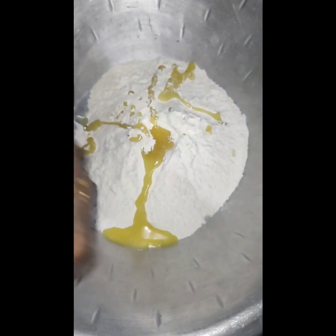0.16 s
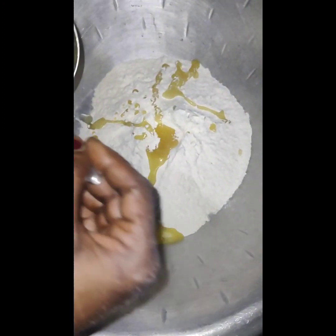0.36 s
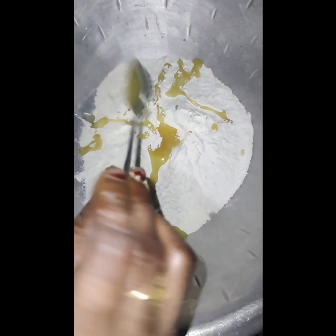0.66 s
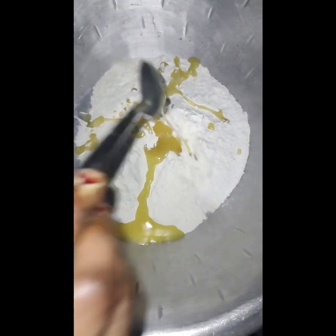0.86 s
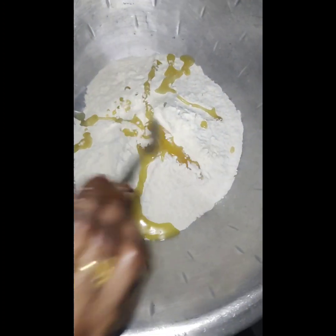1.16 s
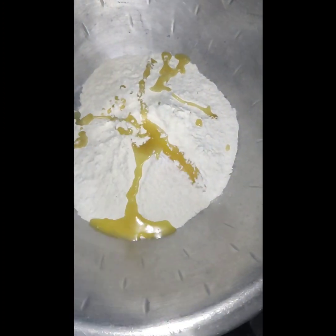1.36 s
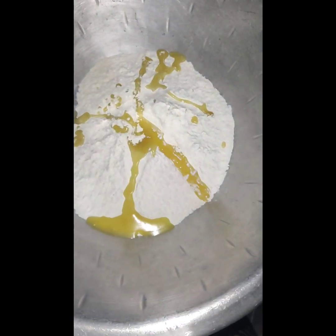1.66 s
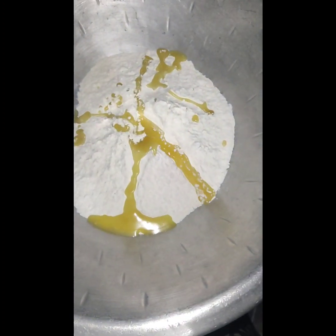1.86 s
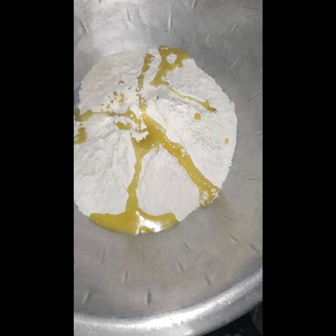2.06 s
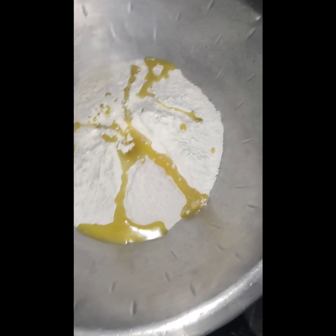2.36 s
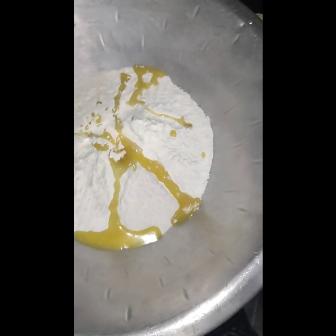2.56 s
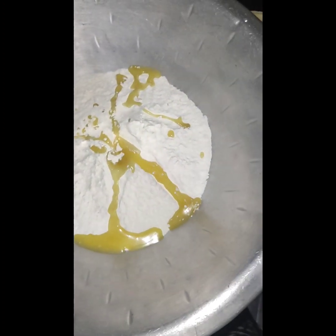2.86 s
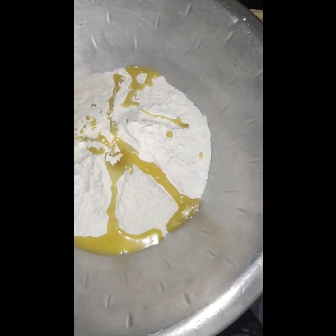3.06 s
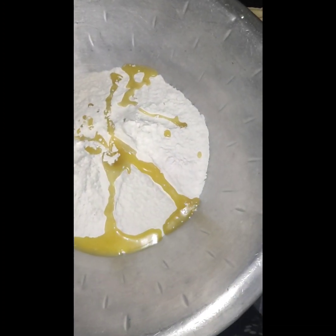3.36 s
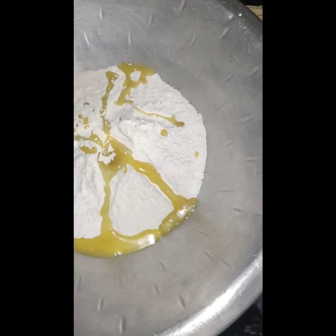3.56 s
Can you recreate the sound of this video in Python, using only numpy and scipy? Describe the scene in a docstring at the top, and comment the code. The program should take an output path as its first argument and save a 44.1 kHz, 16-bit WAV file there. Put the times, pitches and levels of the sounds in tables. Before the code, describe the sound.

Close to a phone in a quiet kitchen, a steel spoon gives light clinks, a pause, a thin tap, then a loud pot knock, short scrape and several bright clanks, fading to faint room murmur.

```python
"""A steel spoon knocks and scrapes in a steel pot just beside a phone, in a quiet hard-walled kitchen.
Before that it clinks on a small cup and taps the rim of a mixing bowl.
Every blow is a crack of noise, the vessel's clear modes and a dense decaying wash of high modes and room.
The scrape is friction grains through the pot's modes, with one mode singing; a low worktop hum swells
under the scrape and the knocks. Behind it all lie room murmur and microphone hiss."""
import sys
import numpy as np
from scipy import signal
from scipy.fft import rfft, irfft, next_fast_len
from scipy.io import wavfile
from scipy.ndimage import uniform_filter1d

SR = 44100
rng = np.random.default_rng(int(sys.argv[2]) if len(sys.argv) > 2 else 0)


def wav_out(sig):
    """Save sig, one row per channel (or a flat mono array), as 16-bit PCM at SR to the path in sys.argv[1]."""
    wavfile.write(sys.argv[1], SR, np.round(np.clip(np.atleast_2d(sig).T, -1, 1) * 32767).astype(np.int16))


N = 163170

# Room murmur and microphone hiss. Each row: frequency in Hz, relative density in dB per Hz.
ROOM_SPECTRUM = [(24, -42), (40, -11), (123, -1.5), (162, -16), (235, -4), (377, -14), (484, -14),
                 (1380, -24), (7340, -25), (15500, -35.5)]
# Likeness of the room in the two channels. Each row: frequency in Hz, left-right likeness from -1 to 1.
ROOM_LIKENESS = [(60, 0.75), (240, 0.98), (950, 0.1), (3770, -0.37), (15000, 0.55)]
ROOM_DB, PATCHY_DB = -62.5, 1.3  # overall level; depth of the patches

# Worktop thumps. Each row: start in seconds, level in dB before the swell, decay and left-right balance.
WORKTOP_THUMPS = [(1.803, -45.5), (1.949, -49.5), (2.08, -50), (2.214, -35.5), (2.361, -55), (2.499, -46),
                  (2.563, -32.5), (2.78, -38.5)]
TOP_HUM_HZ, TOP_T60_S, TOP_RISE_S = 121.3, 0.99, 0.015
TOP_FREE_S, TOP_FADE_T60_S = 0.081, 0.54  # the hum fades faster soon after

# Spoon dragged in the pot. Each row: time in seconds, level in dB, treble over the body in dB.
SCRAPE_COURSE = [(1.86, -35.5, 0.5), (1.912, -39.5, -5.5), (2.012, -39.5, 3.5), (2.068, -47.5, -7),
                 (2.084, -45.5, -5.5), (2.13, -49.5, -11), (2.148, -39.5, -9), (2.21, -59, -10.5)]
# Colour of the rubbed metal. Each row: frequency in Hz, relative density in dB per Hz.
SCRAPE_SPECTRUM = [(120, -36), (200, 4), (479, -20.5), (665, -9), (923, -22.5), (3610, -14), (15500, -13.5)]
# The pot singing under the stroke. Each row: time in seconds, peak in dB.
SONG_COURSE = [(1.97, -56), (1.994, -53), (2.06, -42), (2.146, -43), (2.19, -47)]
GRAINS_PER_S, GRAIN_DB, TREBLE_HZ = 4600, 1.5, 9600
SONG_HZ, GLIDE_HZ_PER_S = 658, 120  # the song rises
SHIFTING_DB = 4.5  # resonances come and go as the contact moves

# Blows on cup, bowl rim and pot. Each row: time in seconds, peak in dB (it sets the crack),
# levels in dB in the five bands 200-450, 450-1000, 1000-3000, 3000-8000 and 8000-15000 Hz,
# left-right in dB, ring time factor, seconds until the ring starts to fade faster,
# then Hz, dB, Hz, dB of the two modes that this contact point favours.
CUP_BLOWS = [(0.1276, -21, -63, -64, -61.5, -47, -48.5, 3.2, 0.32, 0.15, 3520, -57, 5320, -45),
             (0.1951, -27, -44, -35, -35, -32, -34.5, 4.3, 0.78, 0.13, 1210, -29, 3570, -31),
             (0.3483, -34.5, -61, -57.5, -50, -44.5, -43, 5.3, 0.78, 0.16, 1455, -34.5, 5950, -46.5)]
RIM_BLOWS = [(1.277, -25, -56, -45, -42.5, -34.5, -37, 3.5, 0.7, 0.13, 4400, -40, 3050, -48),
             (1.3683, -50, -70, -83, -51, -56, -43, -5.5, 0.14, 0.13, 8900, -61, 12300, -64),
             (1.3872, -34, -37, -72, -53.5, -62, -42.5, -1, 0.49, 0.07, 13200, -60, 12700, -59)]
POT_BLOWS = [(1.726, -7, -69, -23, -34, -28, -35.5, 1.5, 0.85, 0.2, 601.5, -17.5, 2163, -24.5),
             (1.8028, -30, -42, -60, -32.5, -23.5, -27, 2.2, 0.96, 0.13, 2373, -24.5, 6590, -26.5),
             (1.8535, -28, -44, -36, -51, -31, -49, 0.87, 1.2, 0.24, 3682, -32.5, 5470, -27.5),
             (2.081, -28, -59, -49.5, -58.5, -47.5, -48, 2.8, 1.6, 0.18, 3700, -48, 14000, -48.5),
             (2.1074, -42, -45.5, -42.5, -40.5, -86, -51, 5.4, 1.3, 0.23, 1486, -29, 1720, -40),
             (2.218, -24.5, -31, -20, -24.5, -33.5, -33, 1, 0.87, 0.13, 589, -18.5, 868, -18.5),
             (2.2625, -18.5, -36, -38.5, -48.5, -30.5, -30, 2.5, 1.1, 0.18, 3725, -30.5, 6030, -38),
             (2.33, -45.5, -43.5, -38, -51.5, -48.5, -49, 1.7, 0.8, 0.1, 613, -32, 870, -35.5),
             (2.4895, -17, -52.5, -42, -37, -59, -33, 4.5, 0.95, 0.17, 1680, -41, 6280, -34.5),
             (2.4952, -26.5, -58, -45, -46.5, -28, -32, 2.1, 1.03, 0.22, 1042, -34, 6000, -28),
             (2.565, -12, -28, -21.5, -24, -21, -16.5, 1.9, 0.73, 0.13, 532.3, -14, 6160, -21.5),
             (2.626, -34, -49, -46, -42, -41, -38.5, 2, 0.97, 0.14, 1900, -33, 3740, -29),
             (2.7049, -41.5, -42.5, -46, -63, -55, -39, 2.4, 1.1, 0.26, 504, -37, 1420, -49),
             (2.7814, -42.5, -35.5, -38.5, -38, -42.5, -43.5, 0.75, 0.69, 0.38, 2334, -34, 1530, -52),
             (3.1533, -59.5, -74, -63, -67, -64, -53, 2.8, 0.69, 0.15, 470, -73, 6550, -73),
             (3.5222, -50, -85, -79, -83.5, -74, -54.5, 1.8, 0.34, 0.18, 11640, -66.5, 14300, -61.5)]
# Edges of those five bands. One column: frequency in Hz.
BAND_EDGES_HZ = np.array([200, 450, 1000, 3000, 8000, 15000])

# Clear modes of each vessel. Each row: frequency in Hz, dB over the blow's level in that band,
# t60 in seconds before the ring time factor.
CUP_MODES = [(664, -3, 0.59), (783, 2, 0.15), (1258, -4, 0.4), (1358, 0, 0.28), (2660, -6, 0.24),
             (3735, -4.5, 0.14), (3570, 0.5, 0.13), (4050, -10, 0.2), (5030, -16, 0.16), (5500, -1, 0.1)]
RIM_MODES = [(703.4, 1, 16), (1064, -5.5, 1.6), (1240, -10, 1.1), (3003, -6, 0.46), (3470, -14, .2),
             (4070, -10, 0.18), (4867, -13, .16), (5180, -9, 0.17), (6040, -15, .15), (7830, -22, .17),
             (13200, 3, 0.074)]
POT_MODES = [(276.7, -2.5, 0.29), (367.3, -6.5, 0.28), (584, -1.5, 0.22), (779, -9.5, 0.12),
             (501, -17, 0.56), (832, -8.5, 0.093), (1137, -6.5, 0.28), (1600, -11, 0.25),
             (2170, -11.5, 0.25), (3567, -19.5, 0.24), (3760, -9.5, 0.4), (5000, -24, 0.24),
             (5700, -29, 0.26), (5730, -19, 0.28), (6575, -20.5, 0.54), (8100, -17, 0.17),
             (9000, -15, 0.41), (11020, -14, 0.19)]
SPLIT, SCATTER_DB = 0.012, 1.5  # partner's relative offset; level change from blow to blow
RATTLE_DB, RATTLES_PER_S = 2.5, 70  # the spoon chatters on the metal and makes each mode waver
SWELL_CYCLES, FAVOURED_T60_S = 3.1, 0.17

# Clusters of each vessel's dense wash. Each row: centre in Hz, width in Hz,
# prominence in dB before CLUSTER_SHARE multiplies it.
CUP_CLUSTERS = [(750, 260, 1.5), (1267, 195, -0.5), (2330, 700, -3.5), (3570, 770, -6), (3920, 320, -4),
                (4780, 250, -5.5), (5430, 290, -5), (7330, 250, -6.5), (8580, 600, -3), (11340, 5000, -1)]
RIM_CLUSTERS = [(1000, 1030, -5.5), (2930, 610, 4), (4250, 470, 2), (5240, 460, 0), (6170, 910, -4.5),
                (8330, 570, 0), (12900, 2600, 9)]
POT_CLUSTERS = [(582, 342, -1.5), (1713, 290, -6.5), (2340, 610, -3.5), (3677, 300, -1.5), (4460, 250, -2),
                (5010, 220, 0.5), (5940, 430, 1.5), (6470, 120, 4.5), (7540, 450, 2), (9070, 570, 2.5),
                (11720, 2200, 8), (15000, 4400, 10)]
CLUSTER_SHARE, COMB_DB, COMB_HZ = 2.8, 6, 30  # cluster depth; depth and spacing of the fine mode pattern
# Dying away of the wash. Each row: frequency in Hz, t60 in seconds before the ring time factor.
WASH_DECAY = [(200, 1), (700, 0.67), (3000, 0.44), (8000, 0.39), (15000, 0.31)]
WASH_DB, WASH_ALIKE = -2.5, 0.21  # level; left-right likeness
LOW_WASH_DB = -8  # below 1 kHz the clear modes carry the sound
EARLY_DB, EARLY_S = 4, 0.012  # the first instants of crack and wash are louder
CRACK_DB, CRACK_T60_S, FADE_T60_S = -4.5, 0.0041, 0.41

# Valleys in the metal's sound. Each row: centre in Hz, width in Hz, gain in dB.
METAL_VALLEYS = [(3030, 95, -9), (5310, 170, -8.5), (8166, 170, -12.5)]
# Left-right tilt of the metal at the microphone ports. Each row: frequency in Hz,
# left-right in dB before TILT_OFFSET_DB.
PORT_TILT = [(60, 26), (180, -3.5), (550, 0), (1650, -1), (4970, 4), (15000, 4)]
TILT_OFFSET_DB, PORT_DB, LEFT_LEADS_S = -2.5, -1.5, 0.000302
LOW_CUT_HZ, TOP_HZ = 40, 15600


def amp(db):
    """Amplitude for a level in dB."""
    return 10 ** (np.asarray(db) / 20)


def unit(x):
    """x scaled to an RMS of one."""
    return x / np.sqrt(np.mean(x ** 2) + 1e-20)


def along(points, hz):
    """Value at hz on a curve of (Hz, value) points, on a log frequency axis."""
    f, v = np.transpose(points)
    return np.interp(np.log(hz + 1), np.log(f + 1), v)


def filtered(x, response):
    """x times a complex response of frequency."""
    m = next_fast_len(x.shape[-1] + 8192)
    spectrum = rfft(x, m) * response(np.fft.rfftfreq(m, 1 / SR))
    return irfft(spectrum, m)[..., :x.shape[-1]]


def pair(x, alike):
    """Two unrelated signals mixed to a left and right of given likeness."""
    u = np.arccos(np.clip(alike, -1, 1)) / 2
    mid, side = np.cos(u) * x[0], np.sin(u) * x[1]
    return np.array([mid + side, mid - side])


def level(rows, column):
    """A curve column per sample, and a gain that is silent outside the rows, with 32 ms fades."""
    s = np.transpose(rows)
    t = np.arange(N) / SR
    inside = np.minimum(t - s[0][0], s[0][-1] - t)
    return np.interp(t, s[0], s[column]), np.clip(inside / 0.032, 0, 1)


def patchy(x, depth_db, bins, frames):
    """x with random gain patches in time and frequency."""
    z = signal.stft(x, nperseg=512)[2]
    field = uniform_filter1d(rng.standard_normal(z.shape[1:]), bins, 0)
    field = uniform_filter1d(field, frames, 1)
    return signal.istft(z * amp(depth_db * unit(field)), nperseg=512)[1][:, :N]


def clustered(clusters, f):
    """Gain that gathers a wash into clusters, neutral over wide bands."""
    power = sum(amp(2 * g) / (1 + (2 * (f - c) / w) ** 2) for c, w, g in clusters)
    humps = power ** (CLUSTER_SHARE / 2)
    return humps / uniform_filter1d(humps, size=len(f) // 6)


def fine_modes(f):
    """Random gain ripple of many close modes."""
    count = SR // COMB_HZ
    return amp(COMB_DB * np.interp(f / COMB_HZ, np.arange(count), rng.standard_normal(count)))


def room():
    """Room murmur and microphone hiss: slightly patchy noise whose likeness varies with frequency."""
    noise = patchy(rng.standard_normal((2, N)), PATCHY_DB, 6, 10)

    def mid_side(f):
        turn = np.arccos(np.clip(along(ROOM_LIKENESS, f), -1, 1)) / 2
        return amp(along(ROOM_SPECTRUM, f)) * [np.cos(turn), np.sin(turn)]

    mid, side = filtered(noise, mid_side)
    return amp(ROOM_DB) * unit(np.array([mid + side, mid - side]))


def worktop():
    """A low hum swells and dies under the scrape and the knocks."""
    out, t = np.zeros(N + SR), np.arange(SR) / SR
    decay_db = -60 * t / TOP_T60_S - 60 * np.maximum(t - TOP_FREE_S, 0) / TOP_FADE_T60_S
    swell = 1 - np.exp(-(t / TOP_RISE_S) ** 2)
    hum = swell * np.sin(2 * np.pi * TOP_HUM_HZ * t)
    for s, db in WORKTOP_THUMPS:
        out[round(s * SR):][:SR] += amp(db + decay_db) * hum
    return out[:N] * amp([[1.2], [-1.2]])


def scrape():
    """Dense friction grains excite the pot's clustered modes, with moving treble; one mode sings."""
    hits = rng.random((2, N)) < GRAINS_PER_S / SR
    grains = hits * amp(GRAIN_DB * rng.exponential(size=(2, N))) * rng.standard_normal((2, N))
    grains = patchy(grains, SHIFTING_DB, 3, 8)

    def pot_colour(f):
        return amp(along(SCRAPE_SPECTRUM, f)) * clustered(POT_CLUSTERS, f) * fine_modes(f)

    rubbed = unit(pair(filtered(grains, pot_colour), 0.57))
    treble = filtered(rubbed, lambda f: 1 / (1 + (TREBLE_HZ / (f + 1)) ** 8))
    db, on = level(SCRAPE_COURSE, column=1)
    treble_db, _ = level(SCRAPE_COURSE, column=2)
    body = on * amp(db) * (rubbed + (amp(treble_db) - 1) * treble)

    song_db, sings = level(SONG_COURSE, column=1)
    t = np.arange(N) / SR - SONG_COURSE[0][0]
    song = sings * amp(song_db) * np.sin(2 * np.pi * (SONG_HZ + GLIDE_HZ_PER_S * t / 2) * t)
    return body * amp([[2.2], [-2.2]]) + song


def clear_modes(t, modes, band_db, ring):
    """The vessel's own modes, each a close pair of decaying sines that wavers as the spoon chatters."""
    hz, db, t60 = np.transpose(modes)[:, :, None]
    band = np.clip(np.searchsorted(BAND_EDGES_HZ, hz) - 1, 0, len(band_db) - 1)
    start_db = np.array(band_db)[band] + db + SCATTER_DB * rng.standard_normal(hz.shape)
    size = amp(start_db - 60 * t / (t60 * ring))
    knots = rng.standard_normal((len(hz), len(t) * RATTLES_PER_S // SR + 2))
    waver = np.array([np.interp(t * RATTLES_PER_S, np.arange(len(k)), k) for k in knots])
    turn = 2 * np.pi * rng.random((2,) + hz.shape)
    swell = 1 - np.exp(-t * hz / SWELL_CYCLES)
    main = np.sin(2 * np.pi * hz * t + turn[0])
    partner = 0.15 * np.sin(2 * np.pi * hz * (1 + SPLIT) * t + turn[1])
    return np.sum(size * amp(RATTLE_DB * waver) * swell * (main + partner), axis=0)


def favoured_mode(t, hz, db):
    """One mode that the contact point favours: it swells over a few cycles and dies."""
    return amp(db - 60 * t / FAVOURED_T60_S) * (1 - np.exp(-t * hz / SWELL_CYCLES)) * np.sin(2 * np.pi * hz * t)


def dense_wash(t, humps, band_db, ring):
    """Clustered noise for crowded high modes and room, with its own decay at each frequency."""
    fine = np.fft.rfftfreq(len(t), 1 / SR)
    noise = rng.standard_normal((2, len(t)))
    dense = unit(irfft(rfft(noise) * humps * fine_modes(fine), len(t)))
    f, frames, z = signal.stft(dense, SR, nperseg=256)
    centre = np.sqrt(BAND_EDGES_HZ[1:] * BAND_EDGES_HZ[:-1])
    # band levels become densities, as the noise spreads over the whole spectrum
    density_db = band_db - 10 * np.log10(np.diff(BAND_EDGES_HZ) / (SR / 2))
    per_hz = along(np.transpose([centre, density_db]), f) - 40 * (f < 150) + LOW_WASH_DB * (f < 1000)
    decay_db = -60 * frames / (ring * along(WASH_DECAY, f)[:, None])
    wash = signal.istft(z * amp(WASH_DB + per_hz[:, None] + decay_db), SR, nperseg=256)[1]
    return pair(wash[:, :len(t)], WASH_ALIKE)


def strike(blows, modes, clusters, rise):
    """Each blow: crack, modes and wash, coloured by where and how it is struck, until its ring fades faster."""
    out, t = np.zeros((2, N + SR)), np.arange(SR // 2) / SR
    humps = clustered(clusters, np.fft.rfftfreq(len(t), 1 / SR))
    early = amp(EARLY_DB * np.exp(-t / EARLY_S))
    for s, peak_db, *band_db, pan_db, ring, free, hz1, db1, hz2, db2 in blows:
        tone = clear_modes(t, modes, band_db, ring)
        tone += favoured_mode(t, hz1, db1) + favoured_mode(t, hz2, db2)
        wash = dense_wash(t, humps, band_db, ring)
        crack = amp(peak_db + CRACK_DB - 60 * t / CRACK_T60_S) * np.diff(rng.standard_normal(len(t) + 1))
        faster_fade = amp(-60 * np.maximum(t - free, 0) / FADE_T60_S)
        shape = (1 - np.exp(-(t / rise) ** 2)) * faster_fade
        pan = amp([[pan_db / 2], [-pan_db / 2]])
        start = round((s - rise) * SR)
        out[:, start:start + len(t)] += shape * pan * (tone + early * (crack + wash))
    return out[:, :N]


def at_ports(metal):
    """The metal stands to the left: it reaches the left port first, with a tilt and valleys."""
    sides = np.array([[1], [-1]])

    def ports(f):
        valleys_db = sum(g * np.exp(-(2 * (f - c) / w) ** 2) for c, w, g in METAL_VALLEYS)
        side_db = sides * (along(PORT_TILT, f) + TILT_OFFSET_DB) / 2
        return amp(PORT_DB + valleys_db + side_db) * np.exp(1j * np.pi * f * LEFT_LEADS_S * sides)

    return filtered(metal, ports)


def scene():
    """Room and worktop behind; cup, bowl rim and pot close to the microphone ports."""
    metal = scrape()
    metal += strike(CUP_BLOWS, CUP_MODES, CUP_CLUSTERS, rise=0.0015)
    metal += strike(RIM_BLOWS, RIM_MODES, RIM_CLUSTERS, rise=0.0015)
    metal += strike(POT_BLOWS, POT_MODES, POT_CLUSTERS, rise=0.002)
    return room() + worktop() + at_ports(metal)


def record(dry):
    """The phone thins the lowest bass and keeps nothing above its band limit."""
    return filtered(dry, lambda f: (f < TOP_HZ) * (1j * f / (LOW_CUT_HZ + 1j * f)) ** 2)


dry = scene()
out = record(dry)
wav_out(out)
```